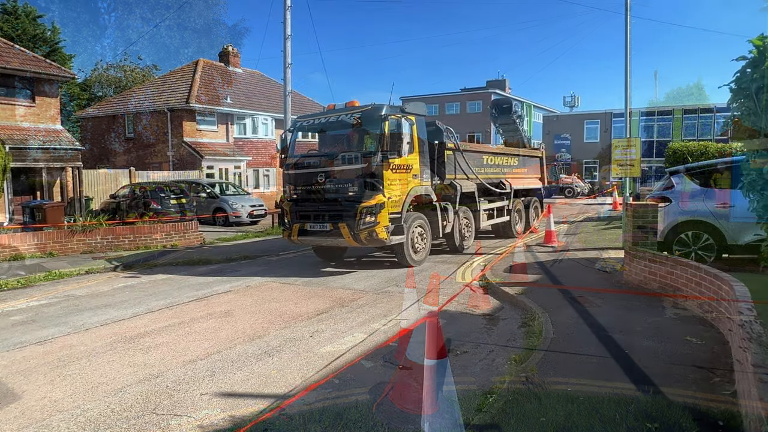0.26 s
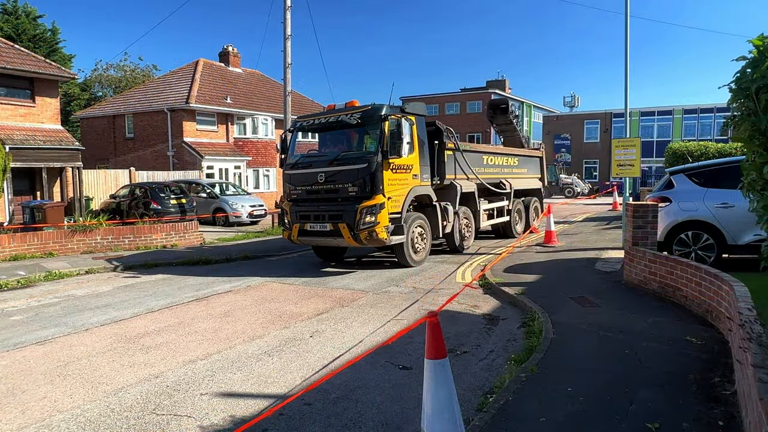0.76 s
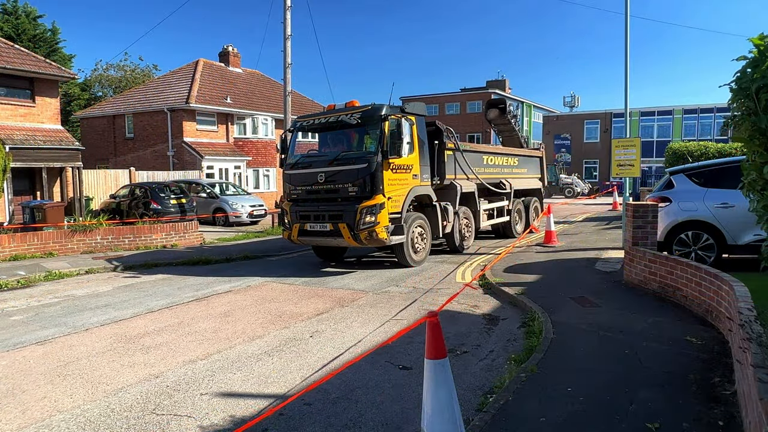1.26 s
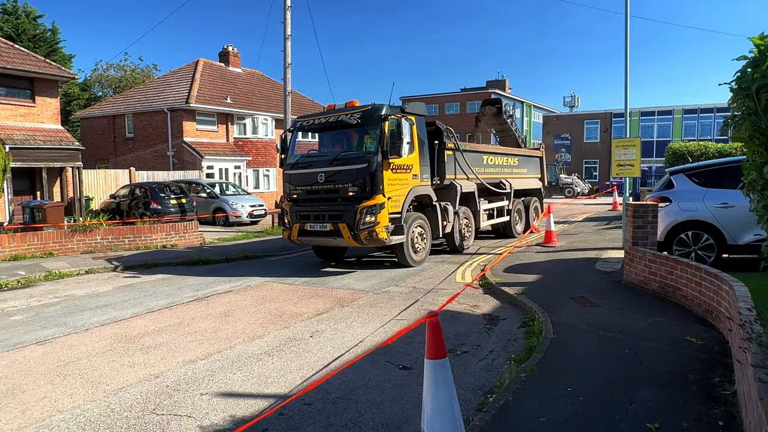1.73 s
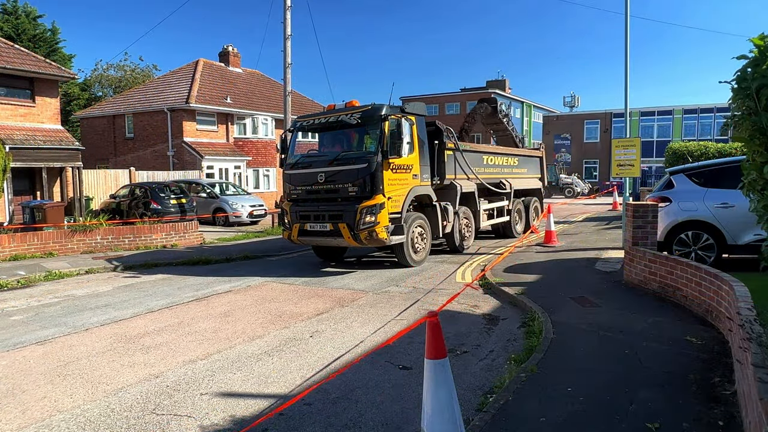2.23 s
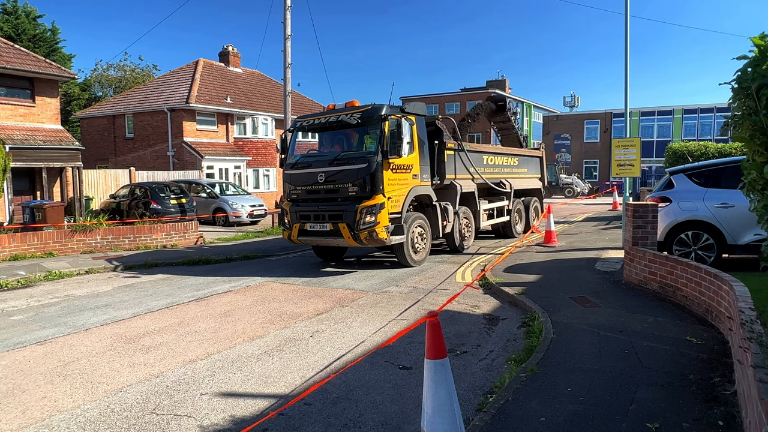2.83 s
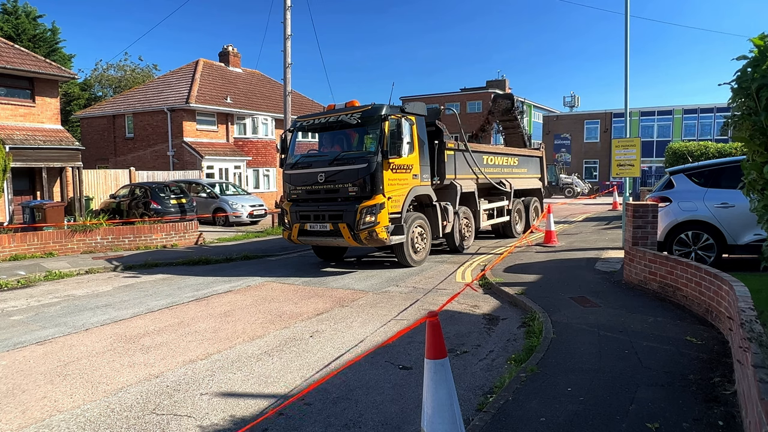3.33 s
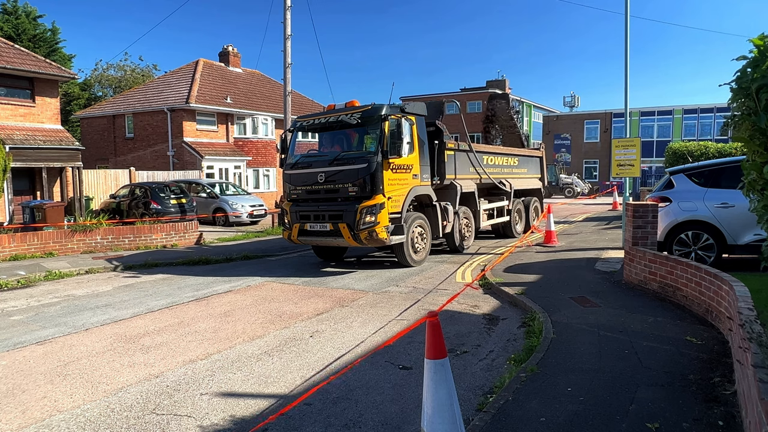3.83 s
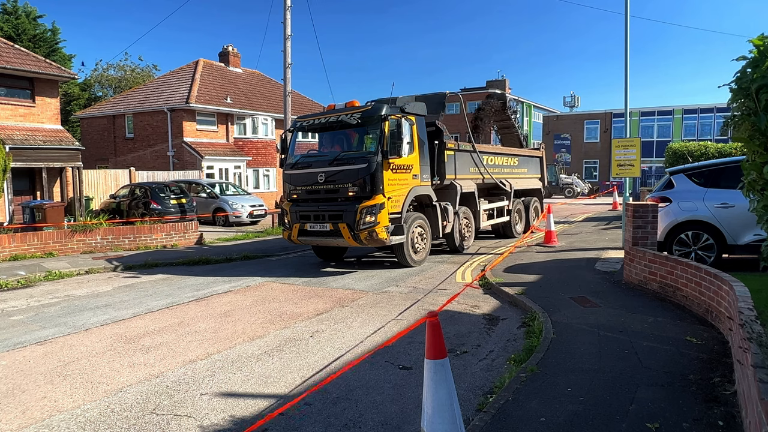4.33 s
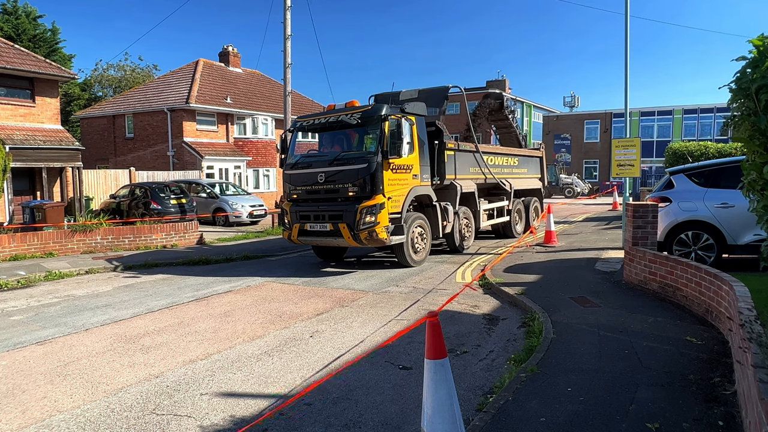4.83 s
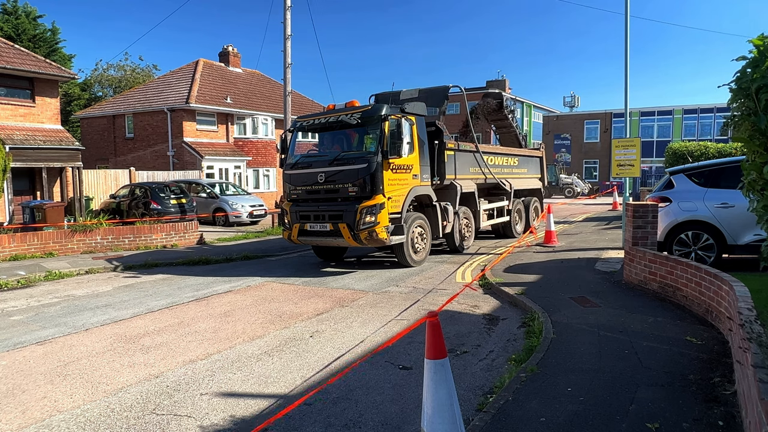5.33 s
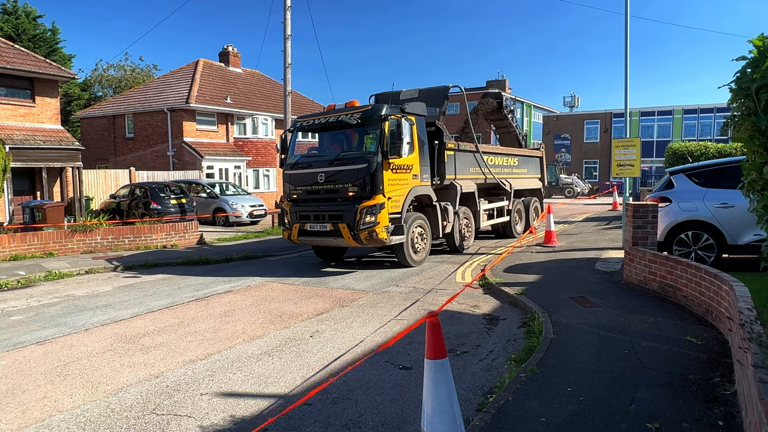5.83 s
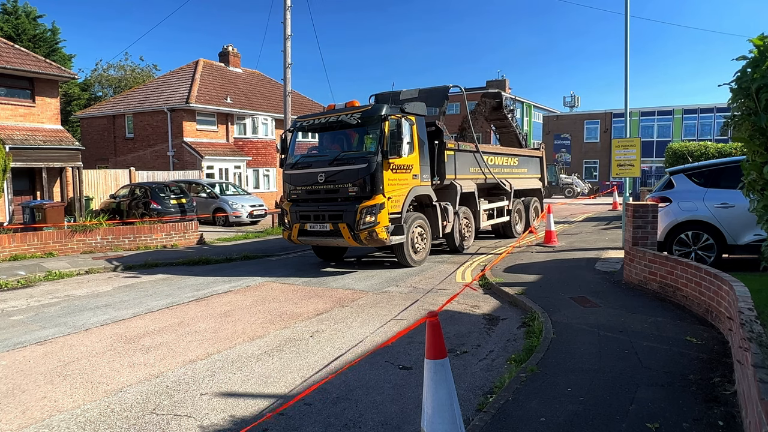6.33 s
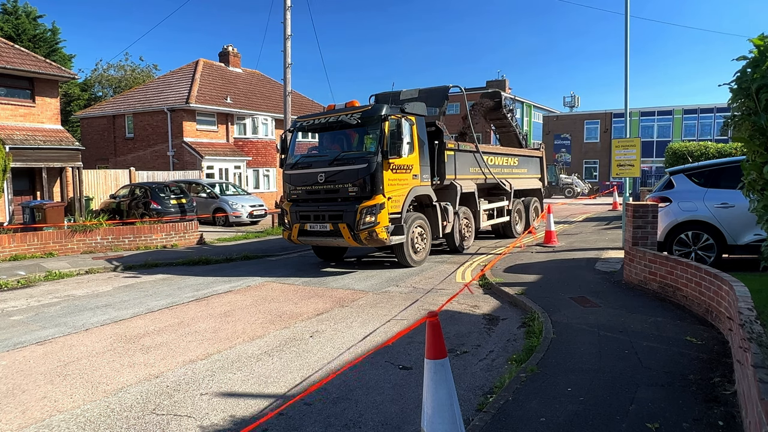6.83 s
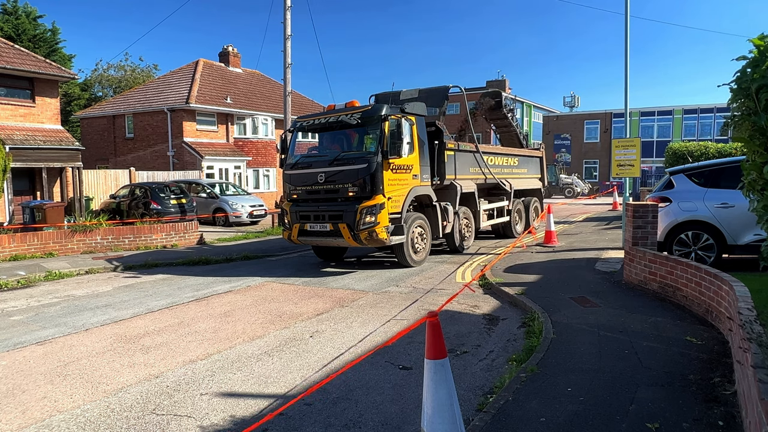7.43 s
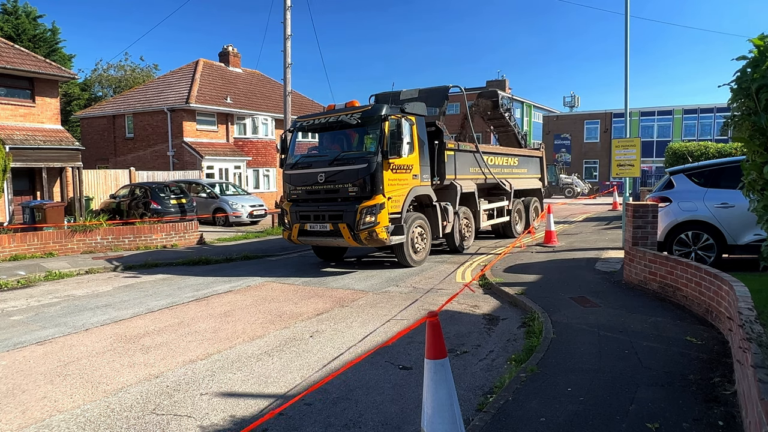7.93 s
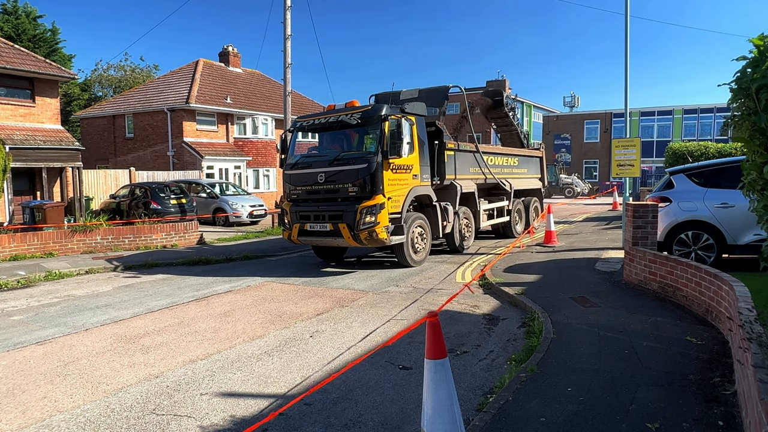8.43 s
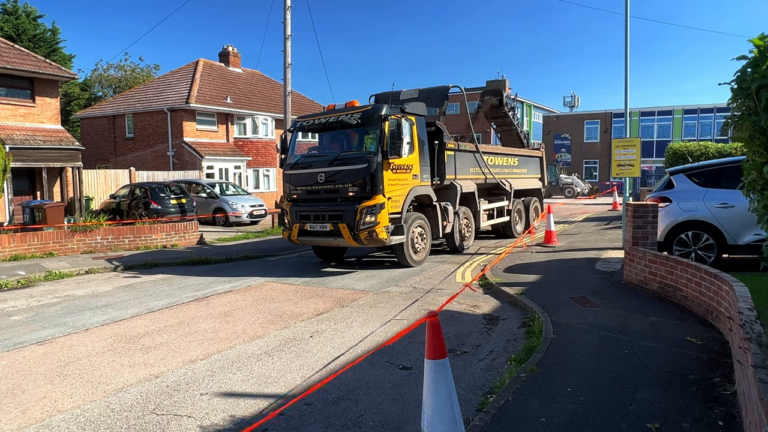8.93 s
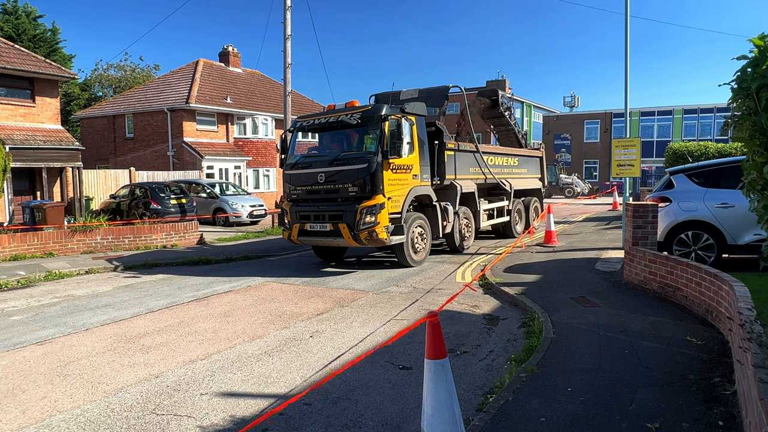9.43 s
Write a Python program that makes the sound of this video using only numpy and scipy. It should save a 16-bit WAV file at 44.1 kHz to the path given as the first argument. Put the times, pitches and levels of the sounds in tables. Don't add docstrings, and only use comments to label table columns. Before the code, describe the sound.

Diesel engines drone on a street, with a few light stone rattles. About two seconds in, crushed asphalt rushes into a lorry's steel bed in loud overlapping surges, hissing, ringing and booming. The pour thins by five seconds into scattered patters, knocks and handfuls, with one late burst near the end. Heard from the pavement across the road in stereo, the engines sink after the first surge and slowly return.

```python
import sys
import numpy as np
from scipy import signal
from scipy.fft import rfft, irfft, next_fast_len
from scipy.io import wavfile
from scipy.ndimage import uniform_filter1d, map_coordinates

SR = 44100
rng = np.random.default_rng(int(sys.argv[2]) if len(sys.argv) > 2 else 0)


def makeup_ratio(level_db):
    decades = np.asarray(level_db, float) / 20
    return 10 ** decades


def put_to_file(sound):
    columns = np.atleast_2d(sound).T
    safe = np.clip(columns, -1, 1)
    whole_steps = np.round(safe * 32767)
    wavfile.write(sys.argv[1], SR, whole_steps.astype(np.int16))


N = 426006
TIME = np.arange(N) / SR
COARSE = TIME[::32]
QUARTER = np.array([[0], [np.pi / 2]])

# start in seconds, peak in dB, centre in Hz, first to last stone in seconds.
SPILLS = [(0.081, -19.5, 4440, 0.0066), (0.3546, -22, 3200, 0.0055), (0.4534, -29, 6660, .003),
          (0.668, -24.5, 3820, .012), (0.914, -26, 5800, 0.01), (1.03, -36, 3060, .008),
          (1.167, -17, 3340, 0.021), (1.6831, -27, 4140, .006), (1.777, -20.5, 4570, .004),
          (1.91, -20, 4500, 0.017), (3.86, -8, 3190, 0.0087), (3.915, -8.5, 3100, 0.0089),
          (4.2268, -20, 2890, .006), (4.335, -17, 2880, .01), (5.8494, -25.5, 3990, .01),
          (5.94, -21.5, 3220, 0.02), (6.1094, -21, 3100, .015), (6.408, -22.5, 2000, 0.012),
          (6.555, -24.5, 3140, .02), (6.81, -31, 3410, .01), (7.072, -27, 3350, .003),
          (7.622, -28.5, 3110, .003), (7.915, -27.5, 4590, .008), (8.1, -25, 4340, .015),
          (8.745, -22, 3230, .02), (8.878, -21, 3300, .015), (9.066, -24, 2870, 0.011),
          (9.178, -27.5, 3000, .015), (9.346, -20.5, 3620, .008), (9.55, -17.5, 2930, .018)]


def unit(x):
    return x / np.sqrt(np.mean(x ** 2) + 1e-20)


def along(points, hz):
    f, *cols = np.transpose(points)
    return [np.interp(np.log(hz + 1), np.log(f + 1), c) for c in cols]


def curves(rows):
    s, *cols = np.transpose(rows)
    return [np.interp(TIME, s, c, left=-120, right=-120) for c in cols]


def wobble(rate_hz):
    knots = rng.standard_normal(int(N * rate_hz / SR) + 4)
    return map_coordinates(knots, [TIME * rate_hz], order=1)


def coloured(x, spectrum):
    m = next_fast_len(N + 8192)
    gain = makeup_ratio(along(spectrum, np.fft.rfftfreq(m, 1 / SR))[0])
    return unit(irfft(rfft(x, m) * gain, m)[..., :N])


def patchy(depth_db, bins, frames):
    z = signal.stft(rng.standard_normal((2, N)), nperseg=512)[2]
    field = uniform_filter1d(rng.standard_normal(z.shape[1:]), bins, 0)
    field = uniform_filter1d(field, frames, 1)
    return signal.istft(z * makeup_ratio(depth_db * unit(field)), nperseg=512)[1][:, :N]


def impacts(rate_hz, spread_db):
    hit = rng.random((2, N)) < rate_hz / SR
    force = rng.standard_normal((2, N)) * makeup_ratio(spread_db * rng.exponential(size=(2, N)))
    return unit(hit * force)


def clump(peak_s, rise_s, peak_db, fall_db_per_s):
    build = np.clip(1 + (COARSE - peak_s) / rise_s, 0, 1)
    fall_db = fall_db_per_s * np.clip(COARSE - peak_s, 0, 2)
    return (build * makeup_ratio(peak_db - fall_db)) ** 2


def load():
    # time in seconds, flow in dB, share of big stones in dB.
    stream = [(0, -42, -20), (1.6, -41, -20), (1.9, -36, -22), (1.985, -20.5, -9.5), (2.3, -20.5, 1.5),
              (2.59, -17.5, -4), (2.99, -20.5, -2.5), (3.21, -20.5, -3.5), (3.49, -25.5, -2.5),
              (3.8, -22, -5.5), (4.13, -24, -5), (4.52, -26.5, -2), (4.62, -32.5, 0.5), (5.0, -30.5, -6),
              (5.37, -38, -3), (6.26, -37, -5), (6.37, -48, 1.5), (9.66, -46, -3)]
    # peak in seconds, rise in seconds, peak in dB, share of big stones in dB.
    surges = [(1.656, 0.043, -40, -20), (2.122, 0.17, -19, -11), (2.362, 0.082, -15, -8),
              (2.82, 0.086, -22.5, 3), (3.04, 0.058, -31.5, 9), (3.55, 0.11, -22, -15),
              (3.66, 0.15, -17.5, -3), (3.72, 0.046, -18.5, -3.5), (4.29, 0.06, -22, -16),
              (4.744, 0.1, -30, -12), (4.994, 0.088, -37, -24), (5.16, 0.025, -36.5, 4),
              (5.4, .03, -34, -14), (5.49, 0.062, -37, 5), (5.626, 0.18, -34.5, -1),
              (5.876, .15, -39.5, -9), (6.04, 0.019, -39.5, 12), (6.138, 0.087, -34, -3),
              (6.3, 0.045, -37.5, 0.5), (6.496, 0.033, -41.5, 4.5), (6.64, .05, -48, 5),
              (6.724, 0.025, -44, -2), (6.855, 0.15, -39.5, 3), (7.202, 0.036, -44, -14),
              (7.358, 0.025, -44, -12), (7.6, 0.13, -45.5, -12), (8.012, 0.086, -38, -6),
              (8.17, .04, -50, -14), (9.41, .06, -28, -11), (9.466, 0.056, -27.5, -8)]
    flow_db, big_db = curves(stream)
    parts = [(clump(s, rise_s, db, fall_db_per_s=123), share_db) for s, rise_s, db, share_db in surges]
    for s, db, _, spread_s in SPILLS:
        parts.append((clump(s + spread_s, spread_s, db - 13, fall_db_per_s=88), -5.5))
    every = np.interp(TIME, COARSE, sum(p for p, _ in parts))
    heavy = np.interp(TIME, COARSE, sum(p * makeup_ratio(share_db) ** 2 for p, share_db in parts))
    return np.sqrt(makeup_ratio(flow_db) ** 2 + every), np.sqrt(makeup_ratio(flow_db + big_db) ** 2 + heavy)


def pour(stones):
    # frequency in Hz, level in dB per Hz.
    rattle_spectrum = [(590, -18), (1000, -6), (1600, -8), (2300, -5.5), (2900, -4.5), (4400, -4.5),
                       (5200, -10.5), (6460, -10), (8760, -17.5), (10000, -21.5), (12000, -27.5),
                       (15500, -29.5), (16000, -120)]
    # frequency in Hz, level in dB per Hz.
    wall_spectrum = [(1800, -39), (2650, -4), (2900, 0.5), (3150, -1), (3400, -1.5), (4500, -45)]
    # time in seconds, ring over rattle in dB.
    aim = [
        (0, -14),
        (1.9, -18),
        (2.4, -8),
        (3.5, -8),
        (3.7, -3),
        (4.5, -4),
        (5, -7),
        (8.7, -13),
        (9.67, -9),
    ]
    ring_db, = curves(aim)
    grit = 0.83 * impacts(4000, spread_db=1.0) + patchy(1.45, bins=10, frames=5)
    blows = impacts(1500, spread_db=2.5) + patchy(4.6, bins=3, frames=4)
    ring = makeup_ratio(ring_db) * coloured(blows, wall_spectrum)
    return stones * makeup_ratio(0.84 * wobble(25) + 0.92) * (coloured(grit, rattle_spectrum) + ring)


def boom(stones, big):
    # frequency in Hz, level in dB per Hz.
    floor_spectrum = [(160, -31), (280, -4), (338, 1), (486, -1.5), (637, 3.5), (777, -2.5), (915, 0.5),
                      (1060, -8), (1160, 0), (1310, -5.5), (2000, -8), (2600, -41), (4400, -120)]
    # frequency in Hz, level in dB per Hz.
    frame_spectrum = [(70, -40), (125, -5.5), (155, 5), (220, 1), (300, -8), (450, -41)]
    frame_db, frame_lag_s, frame_growth = -3, 0.068, 1.314
    drumming = 0.29 * impacts(300, spread_db=1.0) + patchy(2.4, bins=3, frames=6)
    floor = coloured(drumming, floor_spectrum)
    frame = coloured(patchy(0.56, bins=3, frames=6), frame_spectrum)
    step = 1 / (frame_lag_s * SR)
    shake = signal.lfilter([step], [1, step - 1], stones) ** frame_growth
    return big * makeup_ratio(1.26 * wobble(20)) * floor + shake * makeup_ratio(frame_db + 2.0 * wobble(8)) * frame


def spills():
    t60_s, click_t60_s = 0.057, 0.016
    out, t = np.zeros((2, N + SR)), np.arange(SR // 4) / SR
    hz = np.fft.rfftfreq(len(t), 1 / SR)
    for s, db, centre_hz, spread_s in SPILLS:
        band = makeup_ratio(-14 * np.log2((hz + 1) / centre_hz) ** 2)
        burst = unit(irfft(rfft(rng.standard_normal((2, len(t)))) * band, len(t)))
        off_s = abs(t - spread_s)
        decay = makeup_ratio(-60 * off_s / t60_s) + 0.3 * makeup_ratio(-60 * off_s / click_t60_s)
        shape = np.clip(t / spread_s, 0, 1) * decay
        out[:, round(s * SR):][:, :len(t)] += makeup_ratio(db - 13.5) * burst * shape
    return out[:, :N]


def thuds():
    # start in seconds, peak in dB, ring in Hz, T60 in seconds.
    lumps = [(2.988, -9, 280, 0.14), (3.009, -8, 415, 0.065), (3.021, -11, 333, 0.17),
             (3.045, -20, 422, .12), (3.597, -18, 646, 0.082), (4.655, -25, 393, .1),
             (5.147, -21, 893, 0.16), (5.45, -14, 201, 0.095), (5.44, -23.5, 395, 0.21),
             (5.48, -26.5, 328, 0.57), (5.445, -24, 647, 0.14), (6.027, -28, 740, 0.18),
             (7.624, -26, 2020, .03), (7.624, -30, 2550, .03), (7.624, -24, 3150, 0.036),
             (8.77, -26, 597, 0.11), (9.43, -28, 653, 0.21)]
    out, t = np.zeros((2, N + SR)), np.arange(SR // 2) / SR
    for s, db, hz, t60_s in lumps:
        ring = np.sin(2 * np.pi * hz * t + QUARTER)
        ring = ring + 0.37 * np.sin(2 * np.pi * hz * 0.98 * t + rng.uniform(0, 2 * np.pi, (2, 1)))
        attack = 1 - np.exp(-t * hz / 0.53)
        out[:, round(s * SR):][:, :len(t)] += makeup_ratio(db - 4.0 - 60 * t / t60_s) * attack * ring
    return out[:, :N]


def tones(table, drift_hz, sway_db):
    out = np.zeros((2, N))
    for hz, db in table:
        phase = 2 * np.pi * hz * TIME + drift_hz * np.cumsum(wobble(9)) * 2 * np.pi / SR
        out += makeup_ratio(db + sway_db * wobble(4)) * np.sin(phase + QUARTER + rng.uniform(0, 2 * np.pi))
    return out * np.sqrt(2)


def engines():
    # time in seconds, level in dB.
    engine_level = [(0.0, -27), (0.48, -23), (1.94, -23), (2.36, -24), (2.5, -30.5), (3.44, -32.5),
                    (3.66, -39.5), (4.92, -40.5), (7.0, -41), (8.5, -38), (9.3, -35.5), (9.66, -38.5)]
    # frequency in Hz, dB over engine level.
    orders = [(30.15, -38), (45.2, -31), (60.3, -10), (75.4, -8.5), (92, -12), (127, -11.5), (150.7, -10),
              (185, -13), (210, -13.5), (229, -16), (301.5, -13), (381, -28.5), (602.9, -24.5)]
    # frequency in Hz, dB over engine level.
    gear_whine = [(1920, -37), (1918, -25), (1864, -35), (1395, -30.5)]
    # frequency in Hz, level in dB per Hz.
    roar_spectrum = [(15, -48), (25, -33), (53, -3), (76, 3.5), (150, -1.5), (178, -7.5), (217, 0),
                     (253, -1.5), (300, -3), (329, -3), (435, -3), (723, -16), (1000, -17), (1300, -19.5),
                     (2200, -120)]
    # frequency in Hz, level in dB per Hz.
    ducked_spectrum = [(20, -55), (46, -6.5), (74, 2), (159, -8), (182, -13), (245, -6.5), (310, -5.5),
                       (430, -6.5), (470, -11.5), (600, -16), (700, -15), (740, -22.5), (1300, -23),
                       (1700, -44)]
    # frequency in Hz, level in dB per Hz.
    clatter_spectrum = [(350, -35), (600, -4.5), (700, -11), (1300, -9), (1900, -11), (2700, -16),
                        (3300, -23.5), (5000, -33), (6550, -30), (9000, -37.5), (10000, -43), (12000, -42),
                        (15500, -53), (16500, -60)]
    idle_hz = 29.2
    duck_s, settle_s = 3.8, 2.3
    firing = (1 + np.cos(2 * np.pi * idle_hz * TIME)) / 2
    held = np.clip((TIME - duck_s) / settle_s, 0, 1)
    rumble = patchy(0.37, bins=3, frames=12)
    roar = makeup_ratio(1.0) * (1 - held) * coloured(rumble, roar_spectrum)
    roar = roar + makeup_ratio(2.0) * held * coloured(rumble, ducked_spectrum)
    knock = patchy(1.7, bins=8, frames=10) * (1 + 0.3 * firing ** 3) + 0.23 * impacts(600, spread_db=2.5)
    clatter = makeup_ratio(-8.0 + 0.28 * wobble(6.7)) * coloured(knock, clatter_spectrum)
    hum = makeup_ratio(-1.5 * held) * tones(orders, drift_hz=1.707, sway_db=2.7)
    whine = tones(gear_whine, drift_hz=2.77, sway_db=1.1)
    return makeup_ratio(curves(engine_level)[0]) * (hum + whine + roar + clatter)


def scene():
    stones, big = load()
    return pour(stones) + boom(stones, big) + spills() + thuds() + engines()


def roll_off(x):
    return signal.sosfilt(signal.butter(12, 17010, fs=SR, output="sos"), x)


def record(dry):
    # frequency in Hz, likeness 0-1, right leads in rad, left over right in dB.
    mic_pair = [(30, 0.5, -0.5, -2), (70.4, 0.95, 0, 2), (383, 0.82, 0.37, 0.5), (790, 0.22, 0.94, 0),
                (1430, 0.07, 0.64, 0), (2000, 0.68, 1, -0.5), (2450, 0.64, 0.74, 2.5), (3270, 0.24, 1.5, 3),
                (4340, 0, 0, 3.5), (5150, 0.3, 4.5, 8), (6000, 0.2, 1, 8.5), (7560, 0.4, -2.5, 4.5),
                (9160, 0.7, 2, 0), (9550, .85, 1.9, 0), (10250, .95, 3.14, 0), (11950, .9, 6.28, 0),
                (13800, .95, 9.42, 0), (15300, .9, 12.2, 0), (17000, .9, 14, 0)]
    top_hz = 15700
    m = next_fast_len(N + 8192)
    hz = np.fft.rfftfreq(m, 1 / SR)
    direct, thrown = rfft(dry, m)
    alike, lead_rad, tilt_db = along(mic_pair, hz)
    turn = np.arccos(np.clip(alike, 0, 1)) / 2
    shared, apart = np.cos(turn) * direct, np.sin(turn) * thrown
    left = (shared + apart) * np.exp(-.5j * lead_rad) * makeup_ratio(tilt_db / 2)
    right = (shared - apart) * np.exp(.5j * lead_rad) * makeup_ratio(-tilt_db / 2)
    pair = makeup_ratio(0.98) * irfft(np.array([left, right]), m)
    pair = pair / (1 + np.abs(pair / .9) ** 5) ** (1 / 5)
    pair = irfft(rfft(pair) * (hz < top_hz), m)[:, :N]
    return roll_off(pair)


dry = scene()
out = record(dry)
put_to_file(out)
```